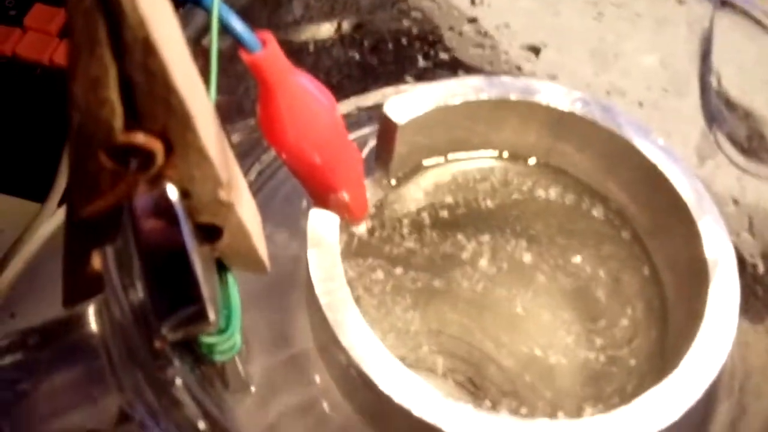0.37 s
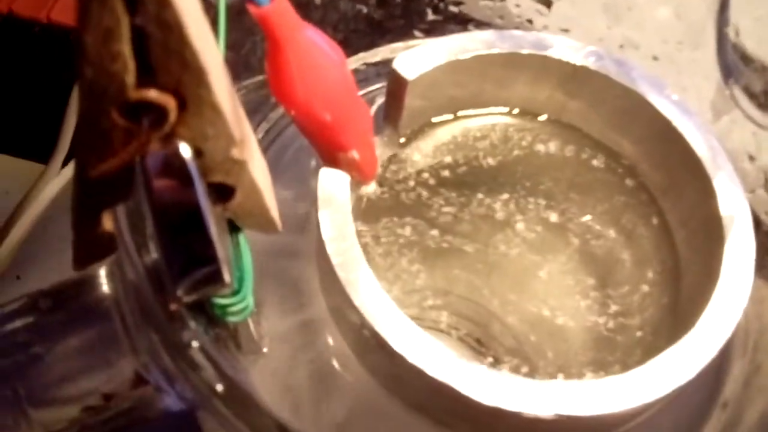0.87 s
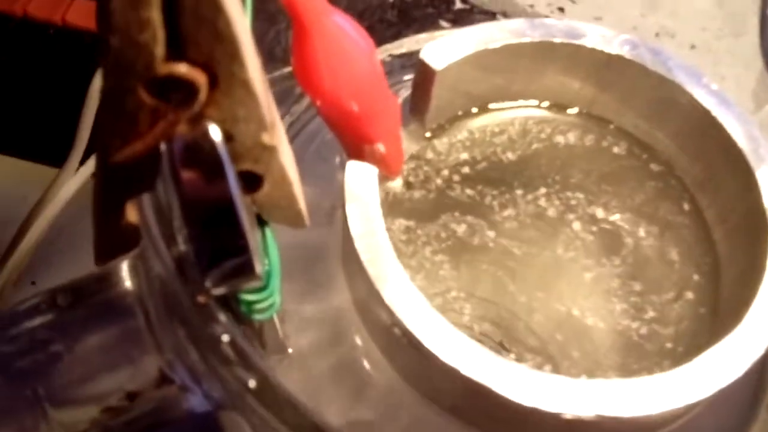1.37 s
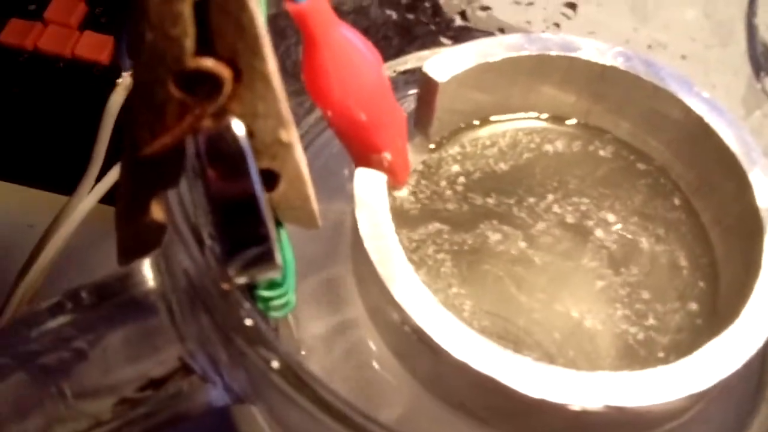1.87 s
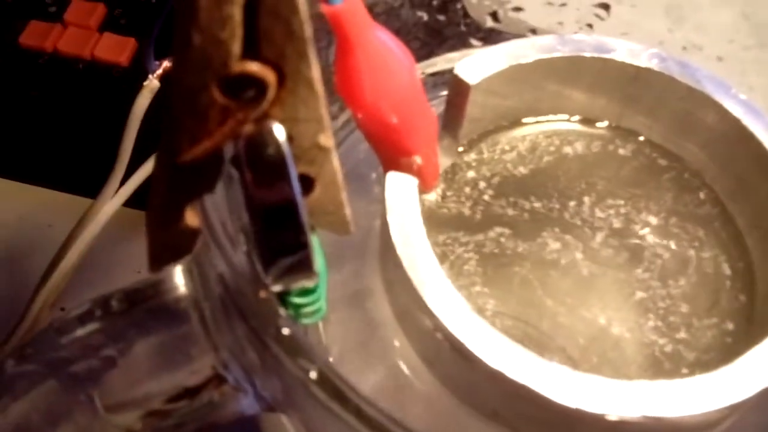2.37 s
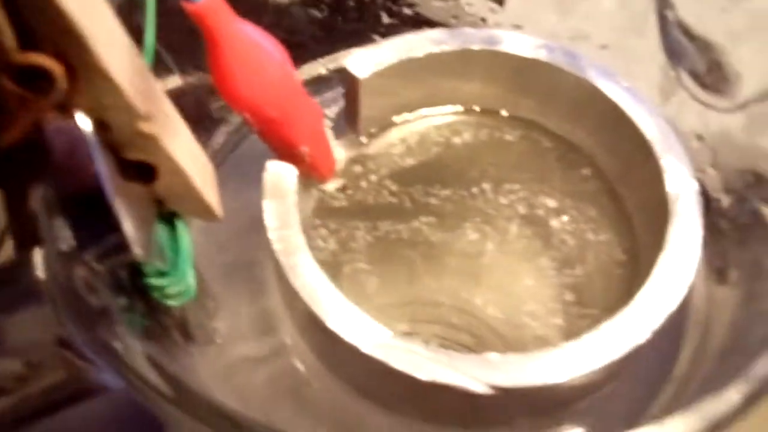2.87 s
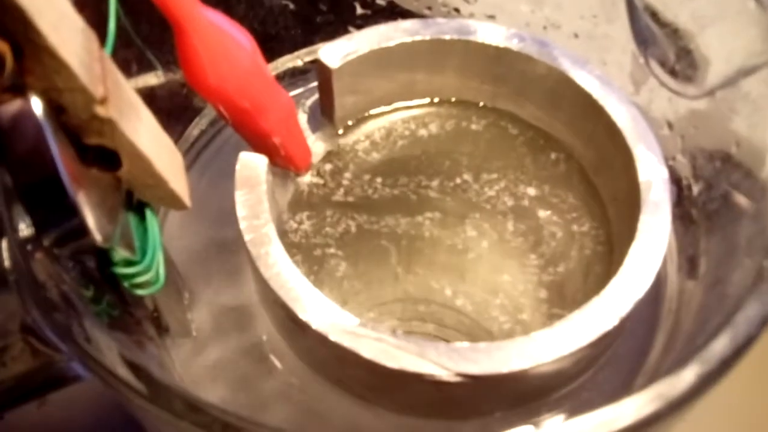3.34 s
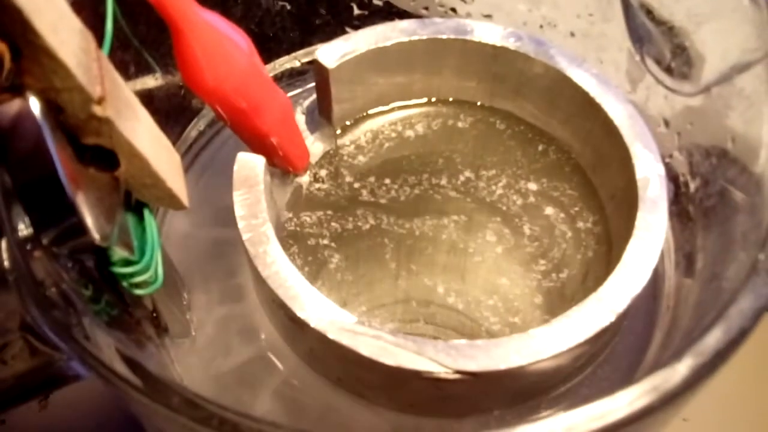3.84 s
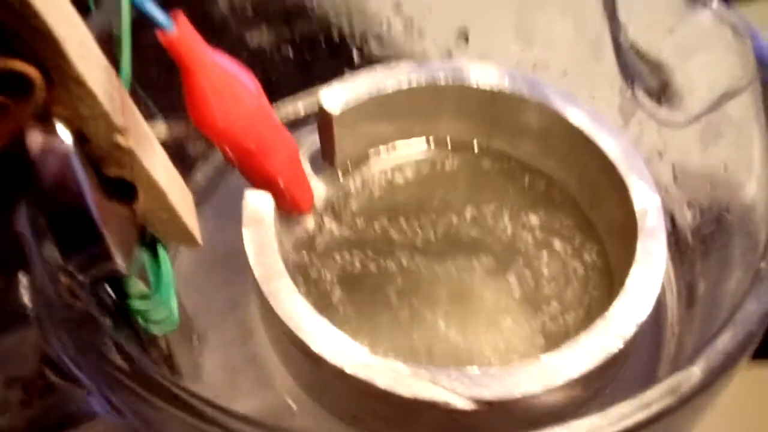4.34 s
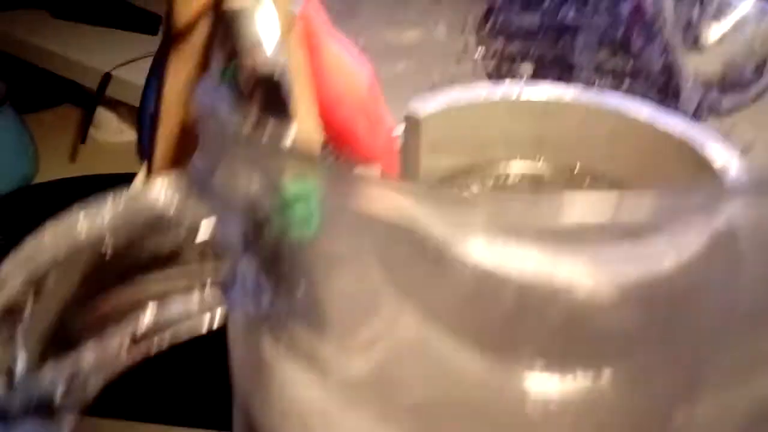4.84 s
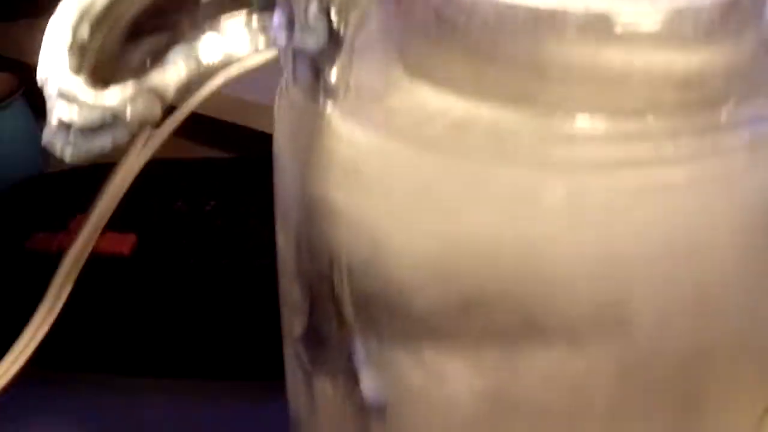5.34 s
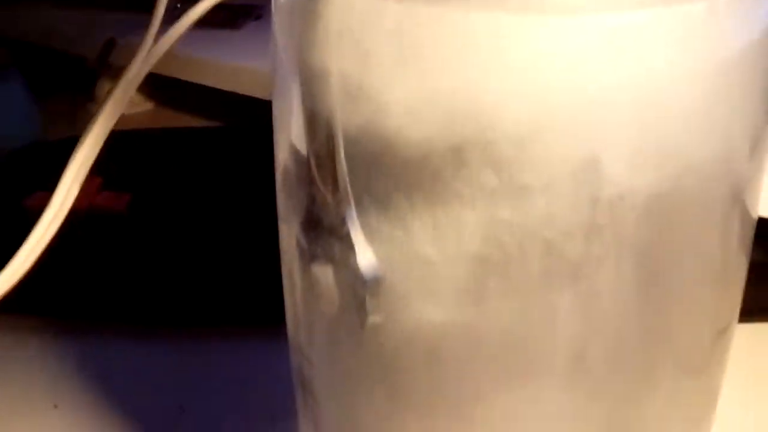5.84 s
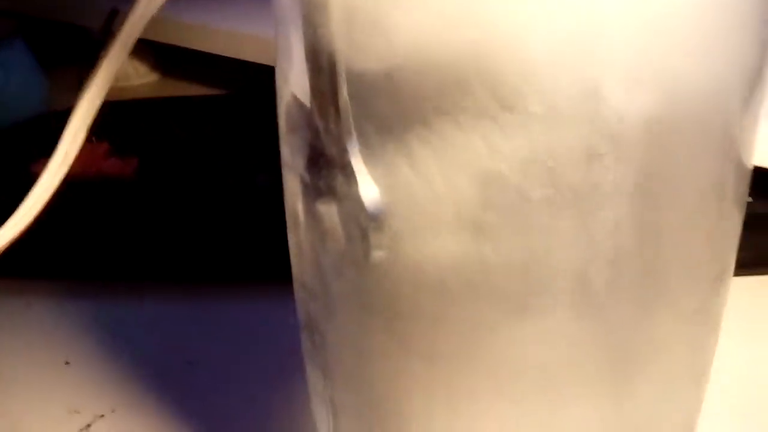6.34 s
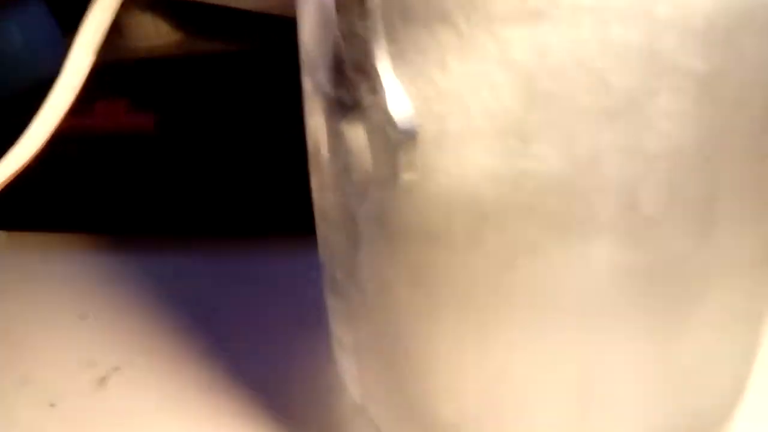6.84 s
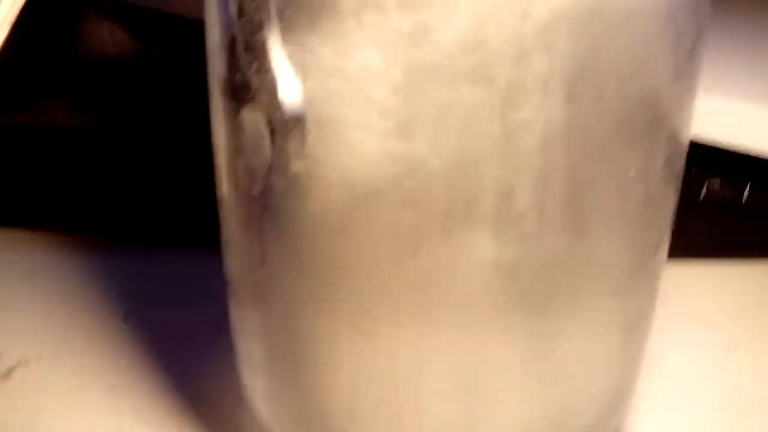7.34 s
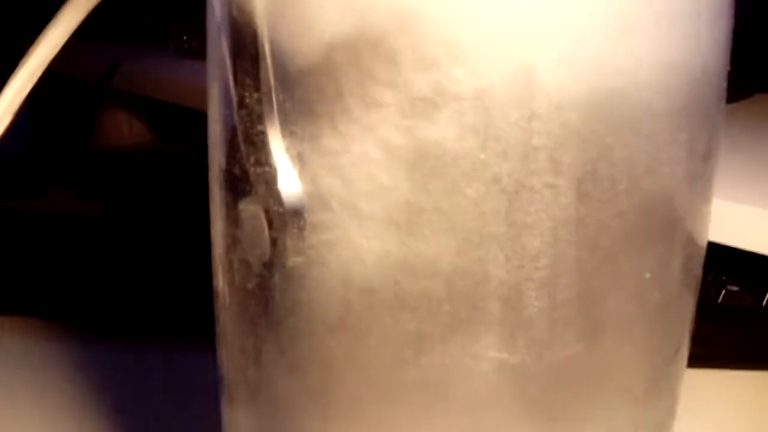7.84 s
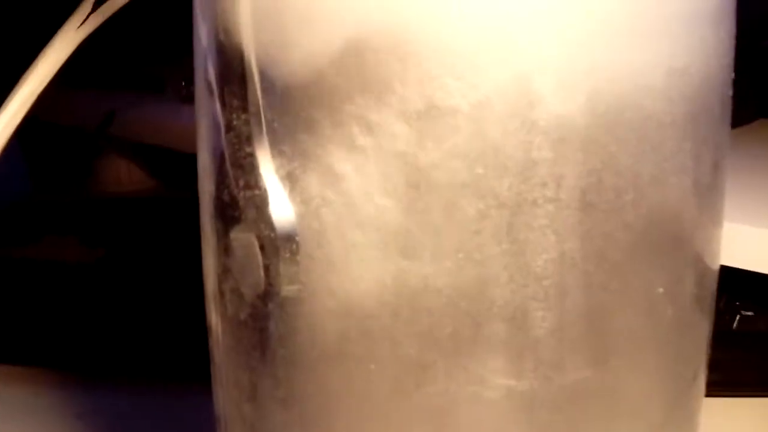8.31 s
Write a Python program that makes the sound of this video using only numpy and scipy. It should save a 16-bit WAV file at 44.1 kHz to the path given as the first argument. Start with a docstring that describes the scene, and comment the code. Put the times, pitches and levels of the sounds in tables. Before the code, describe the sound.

Close to the microphone in a small quiet room, a handheld plastic casing gives a flurry of crisp clicks, later another cluster, then scratchy finger rubbing with one loud snap. A woody table knock comes near the end. Beneath runs a steady low electrical hum with very faint bubbling fizz, and a far engine drone slowly grows.

```python
"""A work table in a quiet room, where a small plastic camera is held by hand. Its casing clicks and rubs under
the fingers: bursts of contact noise through resonances. Something snaps once close by and the table takes dull
knocks: struck modes with noise. A power supply hums and whines as unsteady sines, a jar fizzes with tiny ringing
bubbles, faint whistles come and go, and far outside an engine drones past, slowly rising in pitch."""
import sys
import numpy as np
from scipy import signal
from scipy.fft import rfft, irfft, next_fast_len
from scipy.io import wavfile

SR = 44100
rng = np.random.default_rng(int(sys.argv[2]) if len(sys.argv) > 2 else 0)


def pcm_store(signal):
    """Save signal as 16-bit PCM."""
    levels = np.round(np.clip(np.atleast_2d(signal), -1, 1) * 32767)
    wavfile.write(sys.argv[1], SR, levels.astype(np.int16).T)


def volts_from_db(level):
    """Convert decibel levels to linear amplitude ratios."""
    exponent = np.asarray(level, float) / 20
    return 10 ** exponent


N = 372387   # length in samples


def rms_one(x):
    """Scale to rms 1."""
    return x / np.sqrt(np.mean(x ** 2) + 1e-20)


def at_hz(points, hz):
    """Read a spectrum on a log-frequency axis."""
    point_hz, value = np.array(points).T
    return np.interp(np.log(hz), np.log(point_hz), value)


def cut(x, hz, kind, order=2):
    """Butterworth filter."""
    return signal.sosfilt(signal.butter(order, hz, kind, fs=SR, output="sos"), x)


def drift(rate):
    """Slow random wander of spread 1: noise low-passed near rate (Hz), drawn every 40 samples."""
    r = np.exp(-80 * np.pi * rate / SR)
    slow = signal.lfilter([1], [1, -2 * r, r * r], rng.standard_normal(N // 40 + 4002))
    slow = slow[4000:]   # leave out the settling of the filter
    return np.interp(np.arange(N) / 40, np.arange(len(slow)), rms_one(slow - slow.mean()))


def coloured(spectrum, patchy_db):
    """Noise with the given spectrum, rms 1; each octave swells and sinks on its own by patchy_db."""
    size = next_fast_len(N)
    hz = np.arange(size // 2 + 1) * SR / size + 1e-3
    shaped = rfft(rng.standard_normal(size)) * volts_from_db(at_hz(spectrum, hz))
    octave = np.clip(np.floor(np.log2(hz / 100)), 0, 6)
    parts = (irfft(shaped * (octave == k), size)[:N] * volts_from_db(patchy_db * drift(3.215)) for k in range(7))
    return rms_one(sum(parts))


def wavering(hz, level_db, wobble_hz, wobble_db, rate):
    """A sine whose pitch and level wander at about the given rate per second."""
    phase = 2 * np.pi * np.cumsum(hz + wobble_hz * drift(rate)) / SR
    level = np.sqrt(2) * volts_from_db(level_db + wobble_db * drift(rate))
    return level * np.sin(phase + rng.uniform(0, 2 * np.pi))


def swelling(tones, wobble_hz, wobble_db, rate):
    """Unsteady tones that rise out of silence and sink back."""
    out, t = 0, np.arange(N) / SR
    for start, loudest, end, start_hz, end_hz, level_db in tones:
        swell = np.interp(t, [start, loudest, end], [0, 1, 0])
        glide_hz = np.interp(t, [start, end], [start_hz, end_hz])
        out = out + swell * wavering(glide_hz, level_db, wobble_hz, wobble_db, rate)
    return out


def mode(x, hz, t60):
    """A unit click sets a decaying sine ringing, of height 1 before decay."""
    r, w = volts_from_db(-60 / (t60 * SR)), 2 * np.pi * hz / SR
    return signal.lfilter([0, np.sin(w)], [1, -2 * r * np.cos(w), r * r], x)


def struck(blows, modes, spread_db, sense=-1):
    """Every blow rings each mode with a strength of its own, tilted by hardness; mode k is scaled by sense ** k."""
    s, db, hardness = np.transpose(blows)
    at, out = np.round(s * SR).astype(int), np.zeros(N)
    for k, (hz, level_db, t60) in enumerate(modes):
        hits = np.full(N - at[0], 1e-18)
        tilt_db = hardness * np.log2(hz / 300)
        hits[at - at[0]] = volts_from_db(db + level_db + tilt_db + spread_db * rng.standard_normal(len(at)))
        out[at[0]:] += sense ** k * mode(hits, hz, t60)
    return out


def bursts(blows, decay_s):
    """Noise that starts at each blow and dies away."""
    starts = np.full(N, 1e-18)
    starts[[round(s * SR) for s, db, *rest in blows]] = volts_from_db([db for s, db, *rest in blows])
    decaying = signal.lfilter([1], [1, -np.exp(-1 / (decay_s * SR))], starts)
    return decaying * rng.standard_normal(N)


CLUSTER_SPREAD = 0.045   # side peaks lie this fraction off the middle one
CLUSTER_SHIFT_DB, CLUSTER_SIDES_DB = 2.5, -5.5


def casing(x, resonances, ring_db, freed=((0,),)):
    """Contact noise, direct and through body resonances: clusters of three the shifting fingers favour in turn."""
    out, (since, *gains_db) = x.copy(), np.transpose(freed)
    grip = np.searchsorted(since, np.arange(N) / SR, side="right") - 1
    for k, (hz, width, level_db) in enumerate(resonances):
        r = np.exp(-np.pi * width / SR)
        drive = x * volts_from_db(gains_db[k])[grip] if k < len(gains_db) else x
        for side in (-1, 0, 1):
            w = 2 * np.pi * hz * (1 + side * CLUSTER_SPREAD) / SR
            favoured = drive * volts_from_db(CLUSTER_SHIFT_DB * drift(12.0) + CLUSTER_SIDES_DB * abs(side))
            peak = signal.lfilter([(1 - r * r) / 2, 0, (r * r - 1) / 2], [1, -2 * r * np.cos(w), r * r], favoured)
            out += (-1) ** k * volts_from_db(ring_db + level_db) * peak
    return out


def toned(envelopes, ranges):
    """Contact noise in six ranges, each under its own envelope."""
    noise, out = envelopes * rng.standard_normal((len(ranges), N)), 0
    for part, (low_hz, high_hz, db) in zip(noise, ranges):
        out = out + volts_from_db(db) * cut(part, [low_hz, high_hz], "band", order=3)
    return out


# spectrum of the still room: f/Hz, relative density/dB
ROOM_TONE_COLOUR = [(20, -2.5), (30, 6), (42, -10.5), (65, 1.5), (100, -2.5), (160, 3), (260, -7),
                    (500, -20.5), (1000, -23.5), (2000, -23), (2700, -22), (3200, -24), (4000, -27),
                    (5000, -25), (6000, -26), (6900, -32), (8000, -38.5), (12000, -39.5), (16000, -43.5)]


def room_tone():
    """The quiet room itself: steady coloured noise whose octaves waver slightly."""
    return volts_from_db(-64.5) * coloured(ROOM_TONE_COLOUR, patchy_db=0.7)


def supply():
    """Twice the mains frequency from the transformer core, and a thin unsteady switching whine."""
    hum = wavering(119.95, -54, wobble_hz=0.018, wobble_db=0.5, rate=0.82)
    whine = wavering(10180, -96.5, wobble_hz=25.24, wobble_db=2.5, rate=6.7)
    return hum + whine


# the engine draws nearer: t/s, drone level/dB, rumble level/dB
ENGINE_APPROACH = [(0.0, -70.5, -70.5), (1.6, -68, -71), (3.1, -64, -71), (3.8, -57.5, -69),
                   (5.3, -58.5, -66.5), (5.9, -62.5, -61), (7.2, -60.5, -62), (8.44, -59.5, -61.5)]
# side tones that swell and fade: start t/s, loudest t/s, end t/s, start f/Hz, end f/Hz, level/dB
ENGINE_SIDE_TONES = [(5.6, 7.3, 8.4, 69, 70.5, -66), (3.5, 4.8, 6.9, 229, 236, -64),
                     (5.2, 6.8, 8.1, 397, 404, -68.5), (5.8, 7.0, 8.2, 469, 473, -74),
                     (5.1, 5.9, 7.6, 603, 620, -71.5), (5.8, 7.1, 8.8, 698, 707, -77)]
# spectrum of the rumble: f/Hz, relative density/dB
ENGINE_RUMBLE_COLOUR = [(88, -34), (150, 1), (300, -4), (402, -6), (434, -8), (614, -8), (746, -11),
                        (2000, -28), (2600, -65), (4400, -120)]
DRONE_HZ, DRONE_RISE_HZ_PER_S = 128.9, 1.5


def engine():
    """Far engine: a rising drone, side tones that come and go, and a dull rumble, shaken by the air between."""
    t = np.arange(N) / SR
    s, *levels_db = np.transpose(ENGINE_APPROACH)
    drone_db, rumble_db = [np.interp(t, s, db) for db in levels_db]
    drone = wavering(DRONE_HZ + DRONE_RISE_HZ_PER_S * t, drone_db, wobble_hz=1.49, wobble_db=2.5, rate=2.7)
    rumble = volts_from_db(rumble_db + 1.4 * drift(0.97)) * coloured(ENGINE_RUMBLE_COLOUR, patchy_db=0.0)
    return drone + swelling(ENGINE_SIDE_TONES, wobble_hz=2.5, wobble_db=2.5, rate=7.6) + rumble


FIZZ_PER_S, FIZZ_DB = 300, -83   # base rate of the bubbles, rms level of the fizz
FIZZ_CYCLES = 50   # periods until a bubble has died by 60 dB


def fizz():
    """Tiny gas bubbles in the jar burst at random, in clumps, each ringing briefly at one of 16 pitches."""
    bursting = rng.random(N) < FIZZ_PER_S * volts_from_db(4 * drift(4.0)) / SR
    sizes = volts_from_db(3.5 * np.minimum(rng.exponential(1, N), 2)) * bursting
    dealt = rng.integers(0, 16, N)
    pitches = np.geomspace(1800, 6500, 16)
    rings = (mode(sizes * (dealt == k) + 1e-18, hz, FIZZ_CYCLES / hz) for k, hz in enumerate(pitches))
    return volts_from_db(FIZZ_DB) * rms_one(sum(rings))


# strokes of fingers and cloth; a row that ends before it starts is silent:
# start t/s, loudest t/s, end t/s, relative level/dB, treble level/dB, top level/dB (both re the stroke)
RUB_STROKES = [(0.006, 0.029, 0.057, -48.5, -5.5, -11), (5.061, 5.085, 5.18, -64.5, -30, -29),
               (5.842, 5.862, 6.03, -62.5, -14, -33), (5.963, 5.994, 6.2, -54.5, -8, -18),
               (6.073, 6.104, 6.34, -60, -12, -27), (6.304, 6.343, 6.47, -55.5, -8, -18),
               (6.363, 6.47, 6.59, -58, -6, -21), (6.47, 6.525, 6.53, -55.5, -6, -15),
               (6.5, 6.537, 6.68, -64, -19, -30), (6.58, 6.582, 6.68, -57.5, -14.5, -35),
               (6.613, 6.68, 7.13, -74, -27, -35), (6.968, 6.987, 7.1, -72.5, -31, -32.5),
               (7.191, 7.198, 7.28, -62.5, -13, -23), (7.213, 7.287, 7.73, -59, -11.5, -26),
               (7.348, 7.366, 6.7, -57.5, -10.5, -23), (7.356, 7.404, 7.48, -55, -10.5, -21),
               (7.43, 7.49, 7.508, -57.5, -11, -24), (7.493, 7.508, 7.05, -67, -22, -32),
               (7.62, 7.628, 7.78, -64, -12, -34)]
# levels of the three ranges under the main one: relative level/dB
RUB_LOW_LEVELS = [-18.5, -20.5, -6.5]
# ranges of the rubbing noise: low f/Hz, high f/Hz, relative level/dB
RUB_NOISE_RANGES = [(201.4, 360, 21), (430, 1150, 19.5), (1750, 2900, 10), (2900, 6850, 3),
                    (6760, 10700, 9.5), (11000, 15900, 6)]
# resonances of what is rubbed: f/Hz, width/Hz, relative level/dB
RUBBED_RESONANCES = [(1000, 120, 2), (2480, 170, 2.5), (3860, 26, 2.5), (4770, 86, -3), (5930, 250, -5.5),
                     (6330, 250, -1.5), (6890, 130, -7), (8966, 130, -8.5)]
RUB_FULLNESS = 0.76   # power of the swell: small holds the stroke up, large makes it pointed
RUB_BRIGHTENS = 1   # extra power of the swell in the treble


def rubbing():
    """Skin dragging over the shell: dense uneven grains under each stroke, brightest at its height."""
    envelopes, t = np.full((len(RUB_NOISE_RANGES), N), 1e-9), np.arange(N) / SR
    for start, loudest, end, level_db, treble_db, top_db in RUB_STROKES:
        swell = np.interp(t, [start, loudest, end], [0, 1, 0]) ** RUB_FULLNESS
        envelopes[:4] += volts_from_db(level_db + np.array([*RUB_LOW_LEVELS, 0]))[:, None] * swell
        envelopes[4:] += volts_from_db(level_db + np.array([[treble_db], [top_db]])) * swell ** (1 + RUB_BRIGHTENS)
    own_grain = np.array([drift(40) for band in RUB_NOISE_RANGES])
    grain = volts_from_db(2.0 * drift(150.28) + 0.8 * drift(28) + 0.71 * own_grain)
    return volts_from_db(1.0) * casing(toned(envelopes * grain, RUB_NOISE_RANGES), RUBBED_RESONANCES, ring_db=0.0)


# how long the echo takes to die by 60 dB: f/Hz, t60/s
ECHO_T60 = [(200, 0.46), (1000, 0.32), (2000, 0.32), (5000, 0.29), (12000, 0.067)]


def room_echo(x):
    """Diffuse echo tail: noise that fades in within 4.8 ms and dies away band by band."""
    t, tail = np.arange(SR // 2) / SR, 0
    edges = 100 * 2.0 ** np.arange(0, 7.6, 0.5)
    for low, high in zip(edges, edges[1:]):
        band = cut(rng.standard_normal(len(t)), [low, high], "band")
        tail = tail + band * volts_from_db(-60 * t / at_hz(ECHO_T60, low))
    tail = tail * np.clip(t / 0.0048, 0, 1)
    return signal.fftconvolve(x, tail / np.sqrt(np.sum(tail ** 2)))[:N]


# casing clicks: t/s, relative level/dB, then thump, body and treble level/dB re the click
CASING_CLICKS = [(1.2066, -37.5, -17, -5.5, -4), (1.2121, -39.5, -20, -16, -8), (1.259, -48, -17, -2, -7),
                 (1.267, -26.5, -22, -6.5, -12.5), (1.2855, -32.5, -20, -8.5, -11),
                 (1.2965, -46, -17, -8, -15), (1.307, -44, -25, -9, -13), (1.318, -43, -17, -1, -14),
                 (1.323, -38, -33, -3.5, 0.5), (1.3385, -35, -12, -3, -5), (1.351, -46, -8.5, -12, -7),
                 (1.4765, -29, -20.5, -11, -10), (2.6475, -32, -13, -16, -7.5), (4.363, -51, -20, 2, -14),
                 (4.367, -30, -20.5, -6, -4.5), (4.378, -27.5, -18, -8, -7), (4.387, -42, -20, -6, -10),
                 (4.401, -44, -3.5, -18, -1), (4.416, -49.5, -2.5, -20, 3), (4.4922, -33.5, -22, -9, -5.5),
                 (4.504, -41, -17, -5.5, -4), (4.5323, -44, -26, -9, -12), (4.6255, -58, 5, 4, -33),
                 (4.703, -54, -2, -4, -15), (4.718, -29.5, -15, -6.5, -10),
                 (4.7615, -35.5, -13.5, -2, -11.5), (4.8563, -51.5, -25, -15, -27),
                 (4.947, -66, -4, 5, -23), (5.076, -50, 10.5, -2, -17), (5.995, -37.5, -14, -4, -16),
                 (6.098, -40.5, -25, -13, -13), (6.332, -36.5, -18, -19, -27), (6.581, -38.5, -32, -5, -20),
                 (6.975, -52, -9.5, -10.5, -33), (7.1897, -56, -9, -4, -7), (7.271, -46.5, -14.5, -6, -16),
                 (7.357, -49, -10, 2.5, -24), (7.624, -48.5, -19, -9.5, -11)]
# level of the hollow knock under clicks from each time on: from t/s, level/dB re the click
HOLLOW_KNOCK_LEVELS = [(0.0, -26.5), (2.0, -20.5), (4.0, -17.5), (4.55, -18.5), (5.0, -13), (5.5, -19.5),
                       (7.25, -4.5), (7.3, -22.5)]
# loose parts chatter after a jolt: start t/s, length/s, relative level/dB
CHATTER_BOUTS = [(4.388, 0.05, -59), (4.725, 0.06, -52)]
# chatter colour: relative level/dB in each of the six click ranges
CHATTER_RANGE_LEVELS = [-18, -19, -27, -9, -9, -11]
# ranges of the click noise: low f/Hz, high f/Hz, relative level/dB
CLICK_RANGES = [(201.4, 360, 21), (430, 1210, 19.5), (1050, 2660, 10), (3500, 6850, 3.5),
                (6760, 10700, 9.5), (11000, 15900, 6)]
# resonances of the casing: f/Hz, width/Hz, relative level/dB
CASING_RESONANCES = [(247, 12, -0.5), (543, 57, 4.5), (1604, 85, -1), (1830, 130, -1.5), (2090, 140, 2.5),
                     (3333, 80, -2), (4580, 110, -5), (5220, 72, -4), (6305, 170, 1.5), (8520, 160, -1.5),
                     (10150, 118, -13), (11590, 180, -14)]
# the grip damps or frees the seven lowest resonances: from t/s, seven relative levels/dB
GRIP_DAMPING = [(0.0, 2, -2, -11.5, -8, 2, 4, -4), (1.25, 5, 4, -1, -12, -4.5, 8, 3),
                (1.4, 1, 1.5, -2, -13, 2, 3.5, -17), (2.0, 3.3, -1, -12, -1, 6, 8, -14),
                (4.0, 4.2, 5, -1, 2.5, -6, -21, -10), (4.45, 2, 2, -4, 2, -10.5, -30, -19),
                (4.6, 3.1, 2.5, 1.5, 2, -11, -16, -1), (5.5, 0.33, -2.5, -3, -2.5, -3, -3.5, -7)]
CLICK_RISE_S, CLICK_DECAY_S = 0.00087, 0.0046
CLICK_SPIKE_S, CLICK_SPIKE_DB = 0.00087, 1.5   # the hard first touch
CLICK_TOP_DB, CLICK_TOP_FOLLOWS = -5.5, 1.2   # the top range follows the treble, more steeply
CHATTER_GAP_S, CHATTER_SPREAD_DB = 0.0075, 4


def clicks():
    """Each click is a few milliseconds of chattering contact that starts at once and dies fast."""
    envelopes, t = np.full((len(CLICK_RANGES), N), 1e-9), np.arange(SR // 16) / SR
    spike = volts_from_db(CLICK_SPIKE_DB) * np.exp(-t / CLICK_SPIKE_S)
    shape = np.minimum(t / CLICK_RISE_S, 1) * (np.exp(-t / CLICK_DECAY_S) + spike)
    contacts = []
    for s, db, thump, body, treble in CASING_CLICKS:
        knock = [level for since, level in HOLLOW_KNOCK_LEVELS if since <= s][-1]
        top = CLICK_TOP_FOLLOWS * treble + CLICK_TOP_DB
        contacts.append((s, db + np.array([thump, knock, body, 0, treble, top])))
    for start, length, db in CHATTER_BOUTS:
        after = np.cumsum(CHATTER_GAP_S * rng.uniform(0.5, 1.5, 16))
        sizes = rng.standard_normal((16, len(CLICK_RANGES)))
        for s, size in zip(after, sizes):
            if s < length:
                contacts.append((start + s, db + CHATTER_SPREAD_DB * size + CHATTER_RANGE_LEVELS))
    for s, colour_db in contacts:
        i = round(s * SR)
        envelopes[:, i:i + len(t)] += volts_from_db(colour_db)[:, None] * shape
    noise = toned(envelopes, CLICK_RANGES)
    return volts_from_db(-5.0) * casing(noise, CASING_RESONANCES, ring_db=3.5, freed=GRIP_DAMPING)


# thin parts inside the casing: f/Hz, relative level/dB, t60/s
THIN_PARTS = [(1625, -55, 0.15), (1860, -56, 0.67), (2020, -63, 0.6), (2180, -59.5, 0.68), (2260, -62, 0.5),
              (1034, -42, 0.085), (757, -31.5, 0.089), (3100, -58, 0.43), (3324, -50, 0.27),
              (3550, -58, 0.48), (4460, -56, .35), (5170, -56, 0.45), (5760, -57, 0.73),
              (6550, -54.5, 0.157)]
FIRM_GRIP_S = 3.5   # from here a firmer grip damps the thin parts: clicks no longer excite them


def inner_ring(taps):
    """Thin parts inside ring on after the early clicks, buzzing against their seats."""
    loose = cut(taps * (np.arange(N) < FIRM_GRIP_S * SR), 610, "high")
    return sum(volts_from_db(db + 4.0) * drift(28) * mode(loose, hz, t60) for hz, db, t60 in THIN_PARTS)


# faint far whistles: start t/s, loudest t/s, end t/s, start f/Hz, end f/Hz, level/dB
FAR_WHISTLES = [(1.72, 1.82, 1.95, 1900, 1850, -84), (1.75, 1.85, 1.97, 2250, 2200, -85),
                (8.1, 8.2, 8.38, 2720, 2620, -79)]


def whistles():
    """Brief falling tones, roughened by fast wander of pitch and level."""
    return swelling(FAR_WHISTLES, wobble_hz=80, wobble_db=4.0, rate=130)


# knocks on the table: t/s, relative level/dB, hardness as tilt/dB per octave
TABLE_KNOCKS = [(5.068, -52, -6), (5.092, -47.5, -5), (7.8255, -29, -3), (7.8315, -23, 0),
                (7.8675, -33, 6.5), (7.955, -45.5, -4), (8.015, -48, -7)]
# modes of the table: f/Hz, relative level/dB, t60/s
TABLE_MODES = [(130, -4, 0.094), (158, -10, 0.16), (205, -3.5, 0.096), (261, 2, 0.19), (277.5, -10, 0.3),
               (326, 1.5, 0.093), (396, 0.5, 0.088), (429, 0.5, 0.11), (485, 1, 0.12), (530, -0.5, 0.066),
               (576, -14, 0.11), (700, -16, 0.13), (215.5, -15, 0.31), (346.4, -16, 0.4), (475, -17, 0.27)]


def knocks():
    """Soft blows: the table top rings low, with a woody slap above it and a faint tick at first touch."""
    ring = struck(TABLE_KNOCKS, TABLE_MODES, spread_db=2.0, sense=0.99)
    ring = cut(cut(ring, 125, "high", order=4), 570, "low", order=4)
    slap = bursts(TABLE_KNOCKS, decay_s=0.024)
    long_slap = volts_from_db(-16) * bursts(TABLE_KNOCKS, decay_s=0.058)
    woody = cut(slap + long_slap, [800, 1700], "band") + volts_from_db(-18.5) * cut(slap, [1600, 2700], "band")
    tick = cut(bursts(TABLE_KNOCKS, decay_s=0.0088), [4500, 9500], "band", order=4)
    return volts_from_db(-5.5) * ring + volts_from_db(-9.5) * woody + volts_from_db(-29.5) * tick


# modes of the snapping part: f/Hz, relative level/dB, t60/s
SNAP_MODES = [(1020, -12.5, 0.011), (1174, -12.5, 0.015), (1520, -6.5, 0.0084), (1880, -10, 0.016),
              (2158, -3.5, 0.022), (2056, -24, 0.083), (2190, -34, 0.18), (2225, -30.5, 0.18),
              (2300, -29, .12), (2525, 0, 0.013), (2730, -3.5, 0.015), (2900, -6, 0.01),
              (3260, -14.5, 0.011), (3760, -31.5, 0.13), (3860, -9.5, 0.0087), (3960, -25, 0.11),
              (4120, -10, 0.012), (4442, -11, 0.0083), (5050, -12.5, 0.011), (6150, -18, 0.018),
              (7350, -27.5, .01), (7170, -25, 0.0098), (8800, -24.5, 0.018), (9520, -27.5, 0.0072)]
SNAP_S, SNAP_DB = 6.2363, -8.5   # moment, reference level of its parts


def snap():
    """A catch lets go: a small push, full release a millisecond later, a broad crack, then loose parts rattle."""
    blows = [(SNAP_S, SNAP_DB - 11.0, 0), (SNAP_S + 0.000875, SNAP_DB + 0.5, 0)]
    release = struck(blows, SNAP_MODES, spread_db=0.5)
    # the part is too small to radiate bass
    release = cut(cut(release, 650, "high", order=4), 9900, "low", order=3)
    crack = cut(bursts([(SNAP_S, SNAP_DB - 8.5)], decay_s=0.0032), [1200, 5500], "band", order=3)
    rattle = cut(bursts([(SNAP_S + 0.0043, SNAP_DB - 24.5)], decay_s=0.04), [1300, 5500], "band", order=3)
    return release + crack + rattle


def scene():
    """Handling close to the microphone, its echo, and the background."""
    background = room_tone() + supply() + engine() + fizz() + whistles()
    rubs, taps, thud, release = rubbing(), clicks(), knocks(), snap()
    inner = inner_ring(taps)
    sent = volts_from_db(-7.5) * taps + volts_from_db(-13.5) * rubs + volts_from_db(-7.5) * inner + volts_from_db(-18) * release + volts_from_db(-8.5) * thud
    return (taps + volts_from_db(-17.0) * inner + rubs + release + thud + room_echo(sent) + background)[None]


def roll_off(x):
    """The treble ends steeply here."""
    return signal.sosfilt(signal.butter(12, 16500, fs=SR, output="sos"), x)


def record(dry):
    """The top is cut steeply at 16.7 kHz to finish the mix."""
    mix = signal.sosfilt(signal.cheby2(10, 50, 16700, fs=SR, output="sos"), dry)
    return roll_off(mix)


dry = scene()
out = record(dry)
pcm_store(out)
```